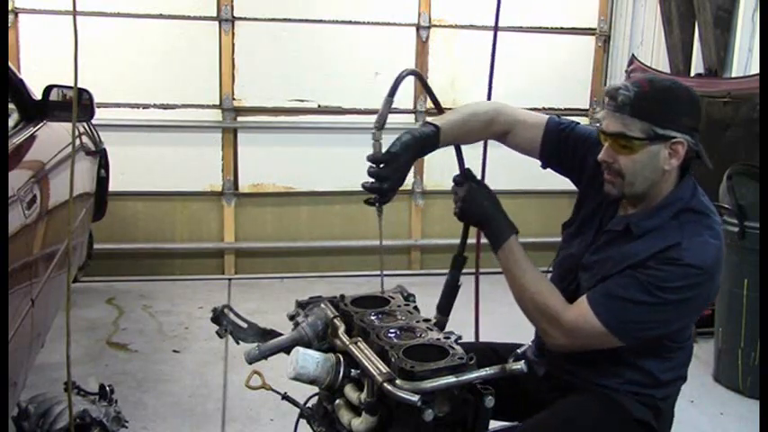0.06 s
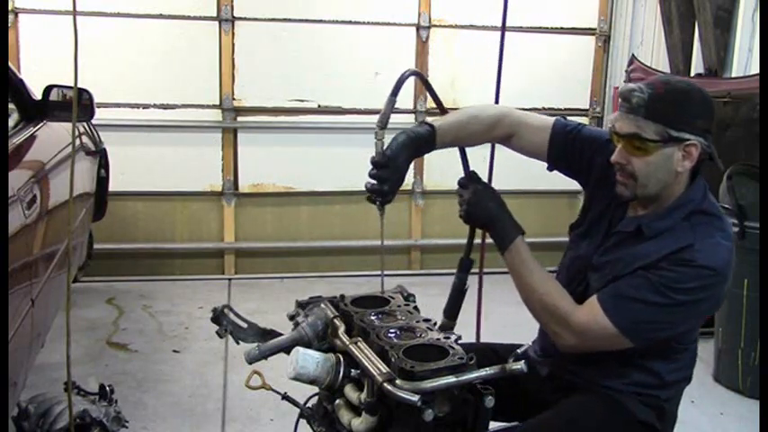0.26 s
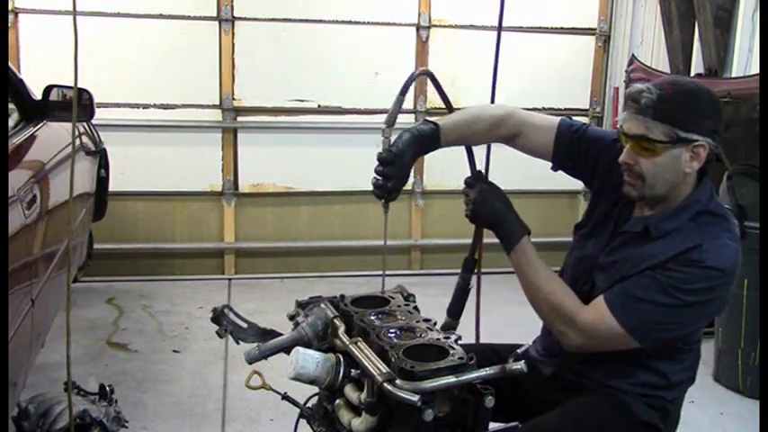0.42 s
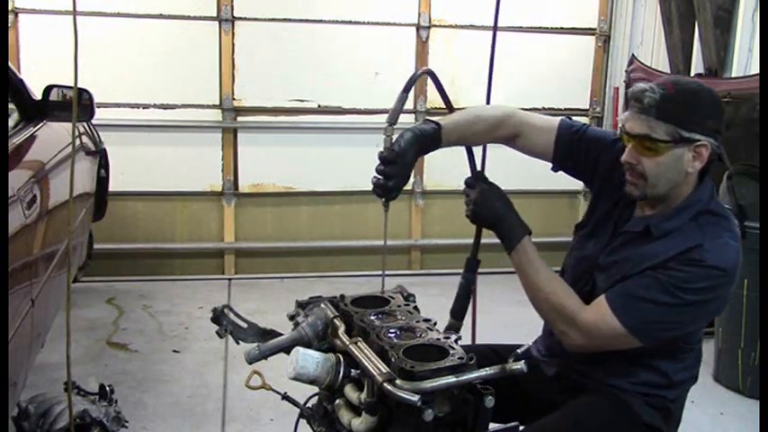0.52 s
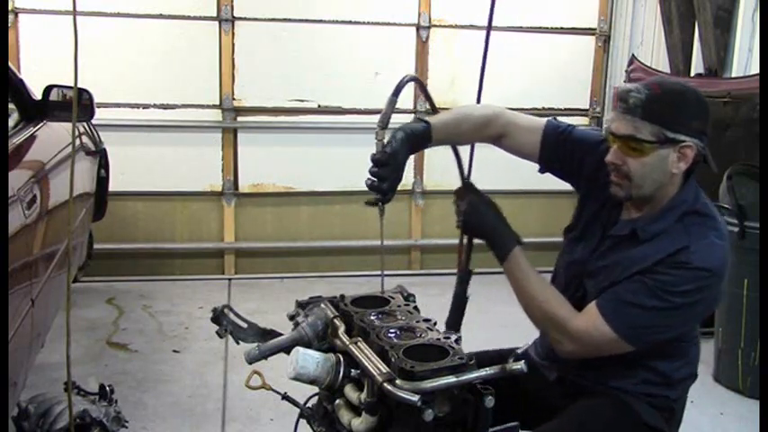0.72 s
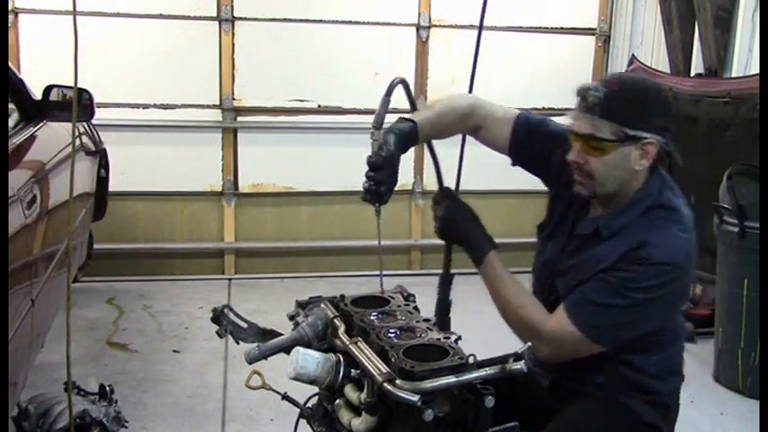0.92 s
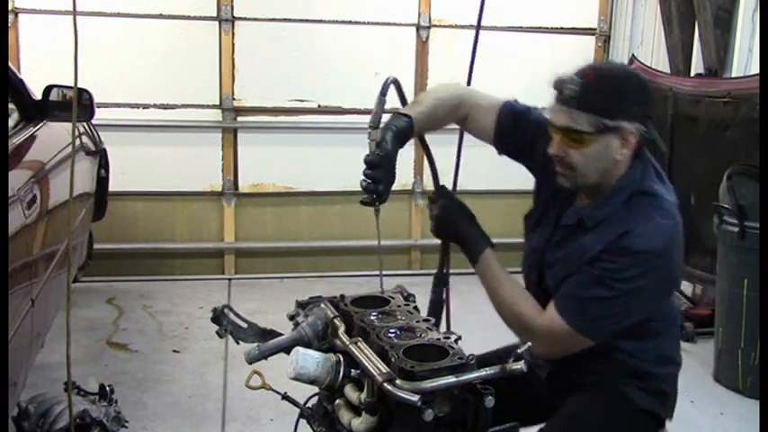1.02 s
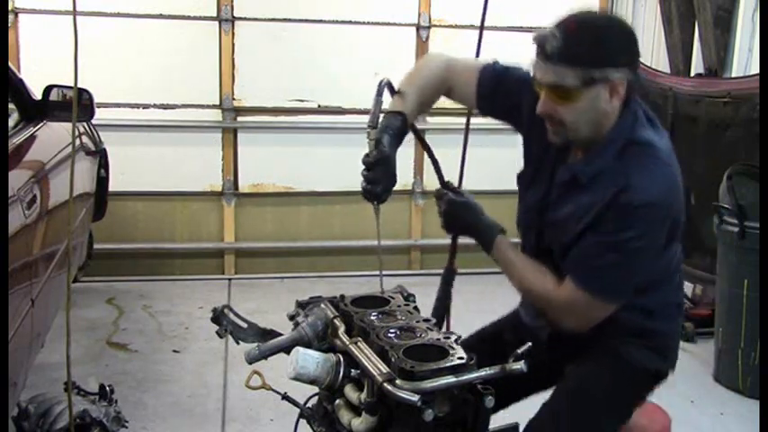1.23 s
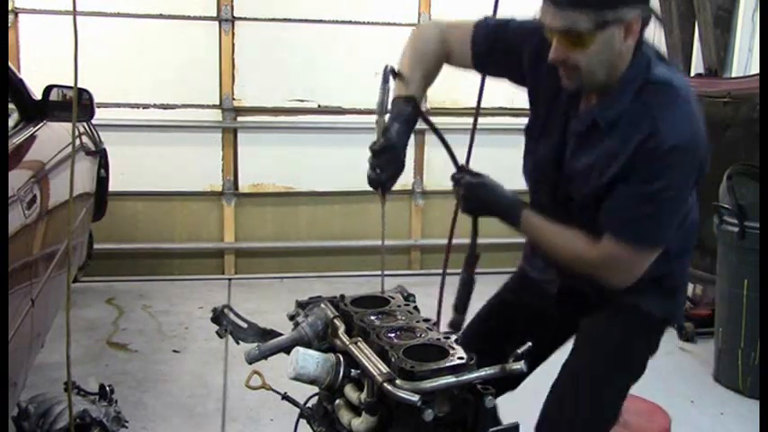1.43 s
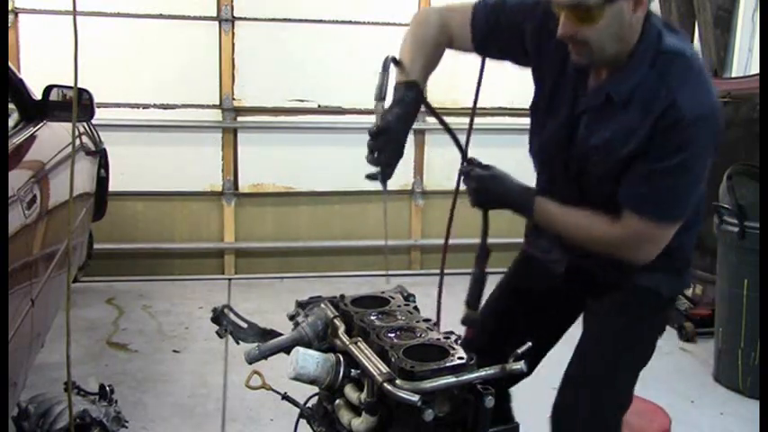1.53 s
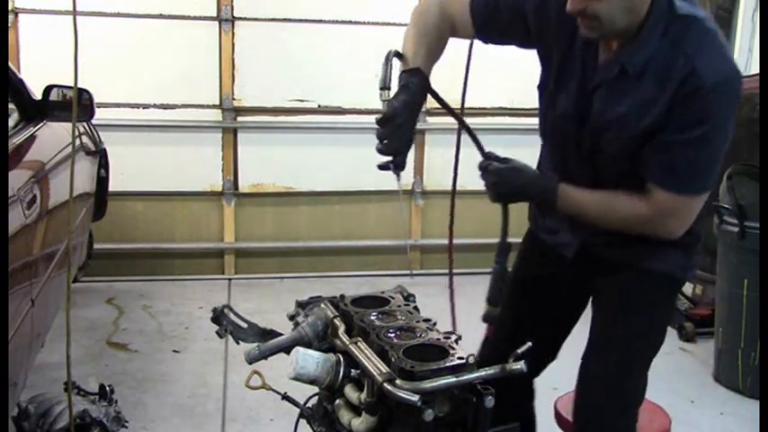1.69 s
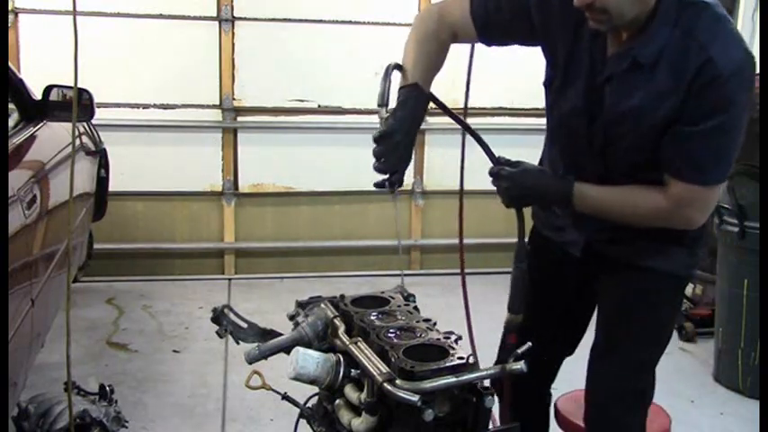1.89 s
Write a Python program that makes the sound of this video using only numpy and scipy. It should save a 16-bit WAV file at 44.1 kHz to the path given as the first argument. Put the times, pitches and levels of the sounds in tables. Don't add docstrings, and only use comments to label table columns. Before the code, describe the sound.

A compressed-air blow gun blasts into the holes of a metal engine block: four loud, whistling hisses with short gaps, a final swing off the hole, then leftover pressure fades in a garage, close and nearly overloaded.

```python
import sys
import numpy as np
from scipy import signal
from scipy.fft import rfft, irfft, next_fast_len
from scipy.io import wavfile
from scipy.ndimage import uniform_filter1d, map_coordinates

SR = 44100
rng = np.random.default_rng(int(sys.argv[2]) if len(sys.argv) > 2 else 0)


def unload_wav(signal):
    wavfile.write(
        sys.argv[1],
        SR,
        np.round(np.clip(np.atleast_2d(signal).T, -1, 1) * 32767).astype(np.int16),
    )


def magnitude_from_level(level_db):
    exponent = np.asarray(level_db, float) / 20
    return 10 ** exponent


N = 85995
BLOCK_HZ, BLOCK_WIDTH_HZ = 2750, 600


def unit(x):
    return x / np.sqrt(np.mean(x ** 2) + 1e-20)


def along(points, hz):
    f, v = np.transpose(points)
    return np.interp(np.log(hz + 1), np.log(f + 1), v)


def wobble(rate):
    knots = rng.standard_normal(int(N * rate / SR) + 4)
    return map_coordinates(knots, [np.arange(N) * rate / SR])


def noise(gain, patchy_db):
    hz, t, z = signal.stft(rng.standard_normal(N), SR, nperseg=512)
    patches = uniform_filter1d(rng.standard_normal(z.shape), size=5, axis=0)
    patches = uniform_filter1d(patches, size=8, axis=1)
    colour = gain(hz[:, None], t[None]) * np.ones(z.shape)
    colour = colour / np.sqrt(np.mean(colour ** 2, axis=0))
    return signal.istft(z * colour * magnitude_from_level(patchy_db * unit(patches)), SR, nperseg=512)[1][:N]


def peak(hz, centre_hz, width_hz):
    return np.abs(hz * width_hz / (centre_hz ** 2 - hz ** 2 + 1j * hz * width_hz))


# (frequency [Hz], level [dB per Hz])
HISS = [(600, -74), (1200, -18), (1800, -12), (3300, -8), (4500, -5.5), (6850, -4), (9640, -11),
        (15200, -24.5)]


def hiss_db(hz):
    return along(HISS, hz)


# (frequency [Hz], level [dB per Hz])
FLOOR = [(25, -7), (110, -12), (250, -12.5), (1200, -16.5), (2600, -17), (6000, -23), (10000, -30),
         (15200, -31)]


def room_tone():
    t = np.arange(N) / SR
    level_db = -57.5 - 1 * (t > FIRST[-1][0])
    return magnitude_from_level(level_db) * noise(lambda hz, u: magnitude_from_level(along(FLOOR, hz)), patchy_db=1.5)


# (time [s], level [dB])
RUMBLE = [
    (0, -61),
    (.2, -54),
    (.3, -45.5),
    (1.2, -44.5),
    (1.3, -45),
    (1.6, -60.5),
    (1.85, -53),
    (1.95, -67),
]


def rumble():
    t = np.arange(N) / SR
    return magnitude_from_level(np.interp(t, *np.transpose(RUMBLE))) * noise(lambda hz, u: peak(hz, 55, 90) ** 2, patchy_db=1.6)


# (frequency [Hz], level [dB per Hz])
SHUFFLE = [(60, -18), (200, -7), (320, -3.5), (600, -21.5), (1200, -29), (4000, -38.5)]
# (time [s], level [dB])
STIR = [
    (0, -56),
    (.04, -44.5),
    (.07, -54),
    (.1, -57.5),
    (.15, -51),
    (.2, -60),
    (.3, -68),
]


def shuffle():
    t = np.arange(N) / SR
    level_db = np.interp(t, *np.transpose(STIR)) + 2 * wobble(40)
    return magnitude_from_level(level_db) * noise(lambda hz, u: magnitude_from_level(along(SHUFFLE, hz)), patchy_db=1.4)


def earlier_blast():
    t = np.arange(N) / SR
    start_db, t60_s = -58.5, 0.71
    return magnitude_from_level(start_db - 60 * t / t60_s) * noise(lambda hz, u: magnitude_from_level(hiss_db(hz)), patchy_db=1.4)


def tick():
    t = np.arange(N) / SR
    start_s, start_db, t60_s = .0205, -39, .02

    def colour(hz, u):
        click = .6 / (1 + (hz / 7000) ** 8)
        return click + 3.5 * peak(hz, 850, 400) + 1.7 * peak(hz, 5500, 600)

    decay = magnitude_from_level(start_db - 60 * np.abs(t - start_s) / t60_s)
    return (t > start_s) * decay * noise(colour, patchy_db=-1.0)


# (frequency [Hz], level [dB per Hz])
SPLASH = [(15, -4), (40, -8), (357, -1.5), (943, -2.5), (1260, -2.5), (1360, -1), (2000, -1.5),
          (2600, -3.5), (4400, -120)]


def blast(rows, tones, tilt_db):
    s, flow_db, hole_db, hole_hz, splash_db = np.transpose(rows)
    t = np.arange(N) / SR
    hole_width_hz, shut_s = 700, 0.0036

    def at(values, when=t):
        return np.interp(when, s, values)

    def jet(hz, u):
        level_db = hiss_db(hz) + tilt_db * np.log2((hz + 50) / 6000)
        for first_hz, last_hz, width_hz, db in tones:
            glide_hz = np.interp(u, s[[0, -1]], [first_hz, last_hz])
            level_db = level_db + db * peak(hz, glide_hz, width_hz) ** 2
        return magnitude_from_level(level_db)

    def hole_song(hz, u):
        return peak(hz, at(hole_hz, u), hole_width_hz) ** 2

    hiss = noise(jet, patchy_db=1.3)
    hole = magnitude_from_level(at(hole_db) + 1.5 * wobble(30)) * noise(hole_song, patchy_db=1.2)
    splash = noise(lambda hz, u: magnitude_from_level(along(SPLASH, hz)), patchy_db=2.0)
    splash = magnitude_from_level(at(splash_db) + 1.3 * wobble(24.87)) * splash
    valve = (t > s[0]) * np.exp(-np.clip(t - s[-1], 0, None) / shut_s)
    flow = magnitude_from_level(at(flow_db) + 0.11 * wobble(60.16))
    return flow * valve * (hiss + hole + splash)


# (time [s], flow [dB], hole song over flow [dB], hole pitch [Hz], splash over flow [dB])
FIRST = [
    (0.151, -69, -15, 2470, -6),
    (0.207, -45, -15, 2550, -1),
    (0.22, -34, -24, 2500, -3),
    (0.225, -20.5, -4, 2490, -7),
    (.25, -20.5, -31, 2600, -11),
    (0.278, -12, -9.5, 2950, -12),
    (.33, -13.5, -6, 2520, -11.5),
    (0.404, -10.5, -19, 2430, -16.5),
    (0.426, -20, -2, 2500, -6.5),
]
SECOND = [
    (.49, -32, -3, 2540, -5.5),
    (0.514, -30, -3, 2540, -4),
    (0.525, -15.5, -11, 2400, -17),
    (.545, -18, -8, 2560, -10.5),
    (.63, -13, -19.5, 2400, -14),
    (.71, -11, -15, 2510, -14.5),
    (0.731, -18, -21, 2770, -3.5),
]
THIRD = [
    (.85, -35, -32, 2360, -7),
    (0.896, -33, -1, 2360, -4),
    (.902, -16, -21, 2210, -9),
    (.935, -14.5, -20, 2200, -13.5),
    (.98, -13.5, -12, 2420, -14.5),
    (1.05, -11.5, -14, 2150, -13),
    (1.089, -11, -14.5, 2400, -13),
    (1.113, -20.5, 4.5, 3000, -11.5),
    (1.12, -28, 4, 2980, 4.5),
]
FOURTH = [
    (1.237, -43, -36, 2480, 8),
    (1.242, -15, -6.5, 2480, -14.5),
    (1.28, -15.5, -8.5, 2280, -10),
    (1.31, -14.5, -10, 2310, -17),
    (1.36, -13, -15.5, 2200, -14.5),
    (1.42, -9.5, -15, 2240, -13.5),
    (1.465, -14, -14.5, 1980, -12),
    (1.503, -7.5, -12.5, 2220, -12),
    (1.526, -15.5, -34, 2050, -2),
]
SWING = [
    (1.51, -17, -18, 2190, -11),
    (1.533, -13.5, -8.5, 2170, -8),
    (1.566, -9, -17.5, 2350, -11.5),
    (1.592, -11, -7.5, 2890, -13.5),
]
# (first pitch [Hz], last pitch [Hz], width [Hz], level over hiss [dB])
TONES = [
    [(4600, 4560, 220, 6.5), (5900, 6050, 330, 4), (6500, 6900, 550, 3)],
    [(4640, 4550, 200, 4), (5760, 5950, 300, 2.5), (6460, 7700, 2000, 3)],
    [(4100, 4050, 960, 5), (6000, 6000, 500, 1.5), (8060, 7530, 340, 5.5)],
    [(4220, 3740, 630, 3), (5150, 5160, 1700, 7), (7530, 6100, 1400, 5.5)],
    [(4440, 4500, 1800, 4.5), (7150, 7600, 610, 6.5), (11100, 11200, 1900, 7)],
]
TILTS_DB = [
    -2.06,
    0.7,
    -0.06,
    5,
    1.8,
]


def squeezes():
    pulses = [FIRST, SECOND, THIRD, FOURTH, SWING]
    return sum(blast(*pulse) for pulse in zip(pulses, TONES, TILTS_DB))


# (time [s], level [dB])
LEAK = [
    (.153, -62),
    (.165, -47),
    (.2, -40),
    (.212, -40),
    (.222, -23),
    (.24, -67),
]
# (frequency [Hz], level [dB per Hz])
LEAK_HISS = [(500, -26), (1200, 0), (2500, -0.5), (4000, -2), (8000, -5.5), (12000, -8), (15000, -15)]


def leak():
    t = np.arange(N) / SR
    level_db = np.interp(t, *np.transpose(LEAK), left=-120, right=-120) + 1.5 * wobble(80)
    return magnitude_from_level(level_db) * noise(lambda hz, u: magnitude_from_level(along(LEAK_HISS, hz)), patchy_db=1.5)


# (time [s], pitch [Hz], level [dB], t60 [s])
CHIRPS = [
    (.221, 1050, -10, .035),
    (.219, 2550, -14, .065),
    (1.102, 2880, -11, .07),
    (1.242, 5250, -12, .13),
    (1.515, 4050, -10, .06),
    (.172, 7600, -44, .04),
    (.902, 1000, -17, .05),
    (.225, 1300, -15, .03),
]


def whistles():
    t = np.arange(N) / SR
    rise_s, waver_hz = .005, 170
    out = 0
    for s, hz, db, t60 in CHIRPS:
        u = np.clip(t - s, 0, None)
        envelope = magnitude_from_level(db - 60 * u / t60) * (1 - np.exp(-u / rise_s))
        phase = 2 * np.pi * np.cumsum(hz + waver_hz * wobble(250)) / SR
        out = out + envelope * np.sin(phase)
    return out


# (time [s], level [dB])
THUMPS = [
    (.225, -32),
    (.44, -34),
    (0.548, -38),
    (0.736, -30.5),
    (.9, -55.5),
    (1.243, -27.5),
    (1.41, -33),
    (1.569, -23),
]


def thumps():
    s, db = np.transpose(THUMPS)[:, :, None]
    hz = 42 * np.exp(0.068 * rng.standard_normal((len(THUMPS), 1)))
    u = np.clip(np.arange(N) / SR - s, 0, None)
    t60_s = .16
    return np.sum(magnitude_from_level(db - 60 * u / t60_s) * np.sin(2 * np.pi * hz * u), axis=0)


# (time [s], level [dB])
DRIBBLE = [
    (1.6, -20),
    (1.75, -44.5),
    (1.84, -46.5),
    (1.9, -83),
    (1.95, -75),
]


def bleed():
    t = np.arange(N) / SR

    def colour(hz, u):
        soft_hiss = magnitude_from_level(hiss_db(hz)) / (1 + (hz / 8800) ** 6)
        return soft_hiss + .5 * peak(hz, BLOCK_HZ, BLOCK_WIDTH_HZ) ** 2

    return magnitude_from_level(np.interp(t, *np.transpose(DRIBBLE), left=-120)) * noise(colour, patchy_db=-1)


# (frequency [Hz], t60 [s])
ROOM = [(100, 0.55), (250, 0.22), (600, 0.4), (1400, 0.44), (2600, 0.55), (3800, .45), (6000, 0.41),
        (12000, 0.2)]
# (frequency [Hz], level [dB])
ROOM_COLOUR = [(100, -12), (300, -2.5), (1000, -3.5), (2600, -3.5), (3700, -6), (5000, -5), (7500, -1),
               (12000, 2)]


def garage(x):
    hop, delay, wet = 2048, 200, np.zeros(N + SR)
    starts = range(0, N, hop)
    hz, t, z = signal.stft(rng.standard_normal((len(starts), SR // 2)), SR, nperseg=256)
    sings = peak(hz, BLOCK_HZ, BLOCK_WIDTH_HZ) ** 2
    colour_db = along(ROOM_COLOUR, hz) + .5 * sings
    t60_s = along(ROOM, hz) + .035 * sings
    decay = magnitude_from_level(colour_db[:, None] - 60 * t / t60_s[:, None])
    tails = signal.istft(z * decay, SR, nperseg=256)[1]
    padded = np.pad(x, (hop, 2 * hop))
    fade = np.sqrt(signal.get_window("hann", 2 * hop))
    for a, tail in zip(starts, tails):
        part = signal.fftconvolve(padded[a:a + 2 * hop] * fade, tail / np.linalg.norm(tail))
        wet[a:a + len(part)] += part
    return wet[hop - delay:][:N]


def scene():
    background = room_tone() + rumble() + shuffle() + earlier_blast() + tick()
    air = squeezes() + leak() + whistles() + bleed()
    mid = air + magnitude_from_level(-3.5) * garage(air) + background + thumps()
    side = magnitude_from_level(-70) * noise(lambda hz, u: (hz + 200) ** -.3, patchy_db=5.0)
    return np.array([mid + side, mid - side])


def microphone(x):
    case_hz, case_width_hz, case_gain = 2650, 600, .25
    top, hard = .92, 8
    m = next_fast_len(N + 8192)
    f = np.fft.rfftfreq(m, 1 / SR)
    damping = 1j * f * case_width_hz
    ring = 1 + case_gain * damping / (case_hz ** 2 - f ** 2 + damping)
    hot = irfft(rfft(x, m) * ring, m)[:, :N]
    return hot / (1 + np.abs(hot / top) ** hard) ** (1 / hard)


# (time [s], edge [Hz])
KEPT = [(.15, 15400), (.18, 12400), (.3, 12800), (.46, 13000), (.5, 14000), (.62, 14500), (.74, 13800),
        (.8, 12900), (.9, 13600), (.99, 13200), (1.15, 12700), (1.225, 12000), (1.24, 15500), (1.38, 14800),
        (1.45, 14400), (1.62, 13900), (1.74, 12900), (1.82, 12800), (1.85, 15400)]
# (start [s], end [s], centre [Hz])
STREAKS = [
    (.17, .275, 14200),
    (.17, .27, 13500),
    (.305, .365, 14200),
    (.4, .475, 14400),
    (.77, .84, 14300),
    (.9, .99, 14300),
    (1.24, 1.53, 15380),
]


def treble_edge(x):
    ragged_hz, half_width_hz = 650, 45
    hz, t, z = signal.stft(x, SR, nperseg=1024)
    ragged = uniform_filter1d(rng.standard_normal(z.shape[1:]), size=2, axis=0)
    ragged = uniform_filter1d(ragged, size=9, axis=1)
    edge_hz = np.interp(t, *np.transpose(KEPT)) + ragged_hz * unit(ragged)
    edge_hz = np.minimum(edge_hz, 15330)
    thin = sum((t > a) * (t < b) * (np.abs(hz[:, None] - c) < half_width_hz) for a, b, c in STREAKS)
    keep = np.clip((edge_hz - hz[:, None]) / 60, thin > 0, 1)
    return signal.istft(z * keep, SR, nperseg=1024)[1][:, :N]


def top_cut(x):
    return signal.sosfilt(signal.butter(12, 15450, fs=SR, output="sos"), x)


def record(dry):
    kept = treble_edge(microphone(dry))
    return top_cut(np.clip(kept, -1, 1))


dry = scene()
out = record(dry)
unload_wav(out)
```